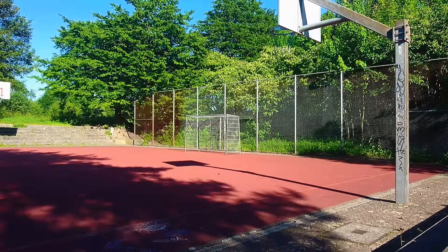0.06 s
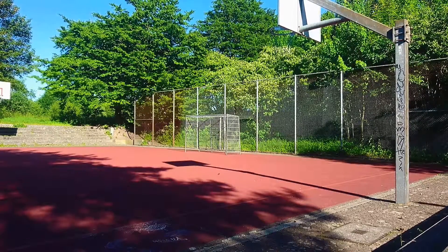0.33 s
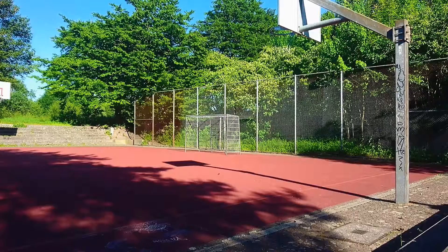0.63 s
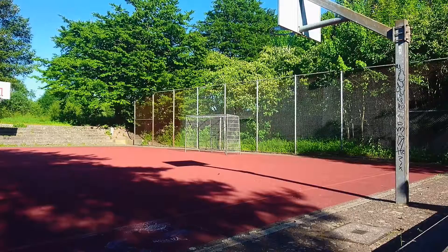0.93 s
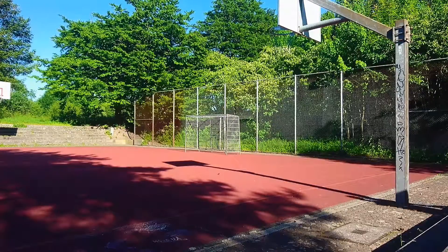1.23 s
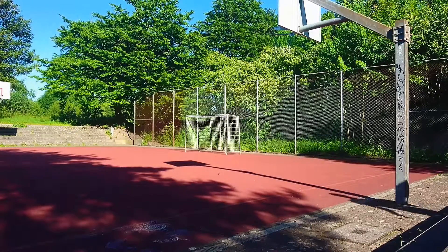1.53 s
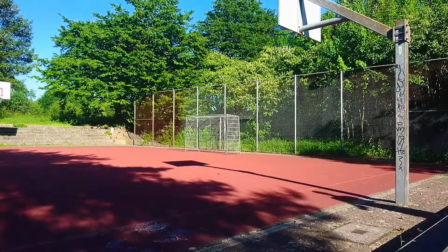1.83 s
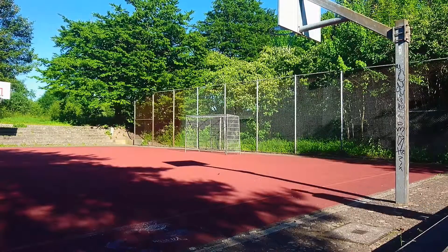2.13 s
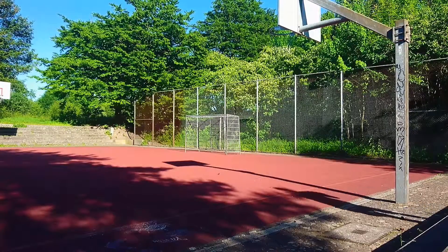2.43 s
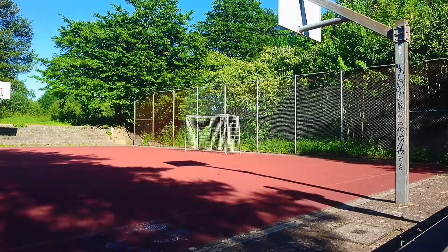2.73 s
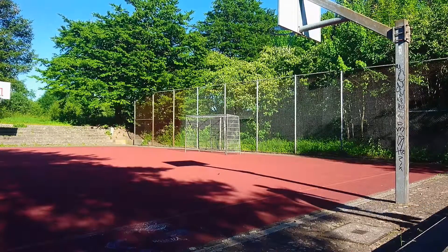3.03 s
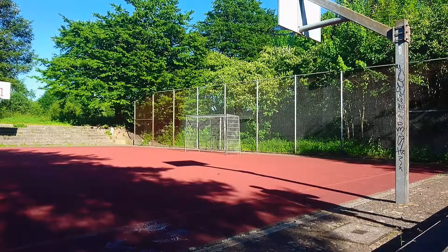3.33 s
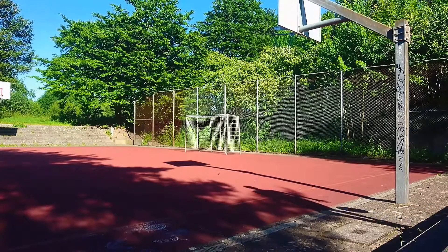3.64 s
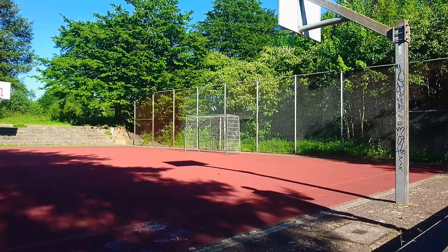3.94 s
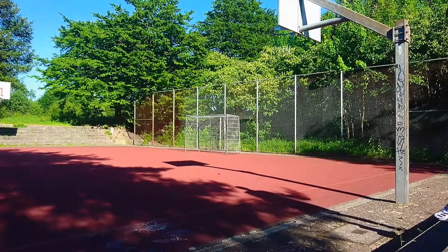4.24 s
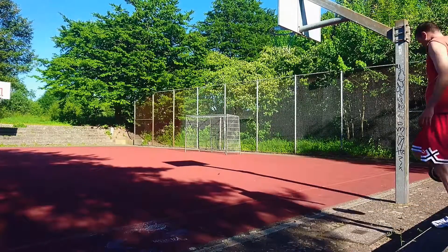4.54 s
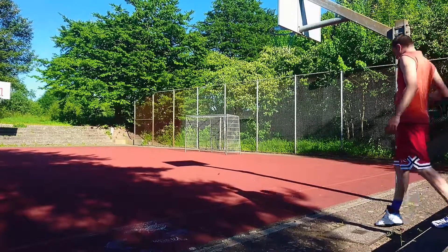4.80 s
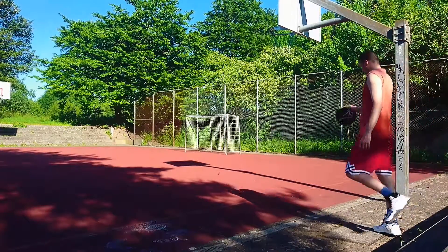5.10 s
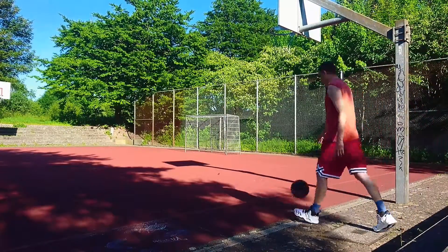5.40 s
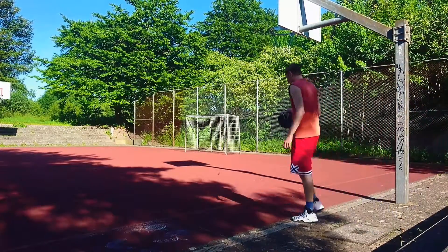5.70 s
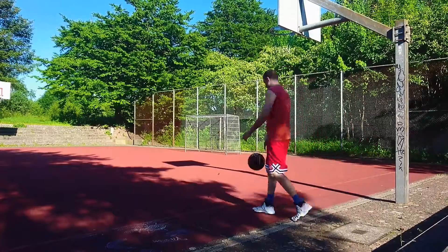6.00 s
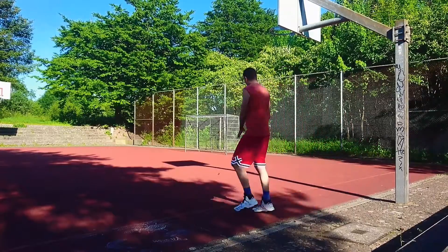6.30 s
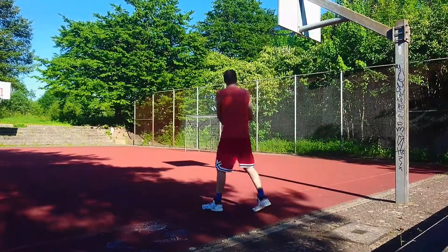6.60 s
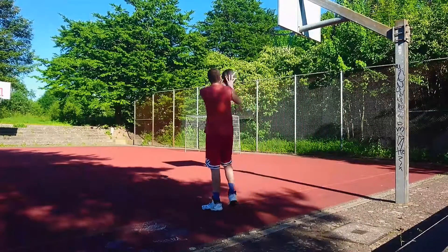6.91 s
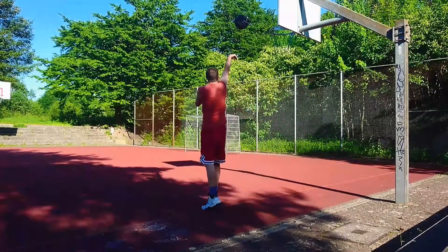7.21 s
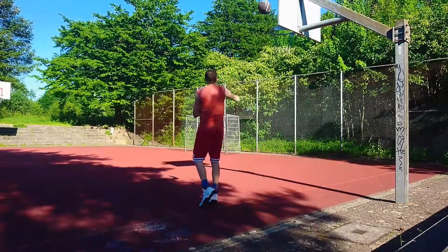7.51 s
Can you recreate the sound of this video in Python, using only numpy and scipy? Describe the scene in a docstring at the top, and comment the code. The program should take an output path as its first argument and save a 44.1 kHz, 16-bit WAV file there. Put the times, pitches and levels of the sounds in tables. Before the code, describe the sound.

A basketball is dribbled slowly on a hard outdoor court, close to the microphones. It bounces at about 0.1, 1.1, 2.2, 3.1, 3.8, 4.6, 5.5 and 6.2 seconds, moving from the right to roughly the centre. Each bounce is a sharp, full thump with a rubbery slap and a brief hollow ring, followed by a light echo from walls, trees and a fence, strongest on the first two. Much softer palm pats meet the ball between bounces, with a clearer one at about 6.4 seconds. Quiet steps with a little grit come at around 2.8 to 3.5 seconds, around 4.5, and again at 6 and 6.6. Faint, high bird chirps continue off to the right, thinning after 5 seconds. A low, distant town hum lies underneath throughout, and a far engine swells briefly at about 6.6 seconds. The last second holds only this quiet background.

```python
"""A basketball dribbled slowly past a spaced microphone pair, from the right onto an outdoor court.
Each bounce squashes the ball (thump), slaps its skin and rings the shell and the air inside.
Walls, trees and a fence answer, less strongly as the player walks on. Near the microphones, hands
and shoes make small sounds; farther off, warblers sing in a wood over the hum of a distant town."""
import sys
import numpy as np
from scipy import signal
from scipy.fft import rfft, irfft, next_fast_len
from scipy.io import wavfile

SR = 44100
rng = np.random.default_rng(int(sys.argv[2]) if len(sys.argv) > 2 else 0)


def file_out(sig):
    """Save sig as 16-bit WAV at sys.argv[1]."""
    # one column per channel
    cols = np.atleast_2d(sig).T
    # limit, then scale
    lim = np.clip(cols, -1, 1)
    pcm = np.round(lim * 32767).astype(np.int16)
    wavfile.write(sys.argv[1], SR, pcm)


N = 332955
TIME = np.arange(N) / SR

# Bounces, each on another patch of ball and ground; levels are relative. Each row: start in seconds,
# thump in dB, contact in ms, overtone in Hz and in dB against the thump, slap in dB, slap pitch
# in Hz, crack in dB, shell pitch in Hz, shell in dB, shell t60 in seconds, fence wash in dB and in Hz.
BALL_BOUNCES = [ (0.0615, -17, 10.6, 155, 2.5, -23.5, 1450, -26.5, 406, -31.5, 0.11, -54.5, 1760),
                (1.0762, -16, 10.2, 369, 0, -22, 1920, -22, 472, -32, 0.091, -49, 1900),
                (2.1630, -14.5, 10.2, 186, -13.5, -18.5, 1420, -39.5, 527, -26.5, 0.081, -45, 1300),
                (3.1078, -15, 10.45, 327, -2, -15.5, 1445, -12.5, 438, -32.5, 0.073, -58, 1200),
                (3.8278, -15.5, 10.54, 283, -2, -20, 1010, -17, 431, -22.5, 0.082, -51, 1090),
                (4.5688, -16, 11.68, 320, 1, -23.5, 1170, -19, 393, -22.5, 0.093, -50.5, 1490),
                (5.4678, -14.3, 10.1, 278, -3, -23, 1270, -24, 392, -30, 0.14, -48.5, 1500),
                (6.2259, -15.7, 9.8, 286, -0.5, -23, 1200, -27, 376, -33.5, 0.22, -54, 1080)]
# The player's way past the microphones. Each row: time in seconds, lag at the left microphone in ms,
# wall echo delay in seconds, gain on all echoes in dB.
PLAYER_PATH = [(0, .45, 0.093, 0.5), (1.1, 0.41, 0.093, -1), (3.1, .3, 0.1, -6.5), (4.57, .2, .104, -4.5),
               (5.47, -.06, .108, -5), (6.25, -0.16, 0.11, -4)]
# Air modes inside the ball. Each row: pitch in Hz, level in dB, t60 in seconds.
AIR_MODES = [(958, -54, .3), (1097, -53, .3), (1270, -50, .1), (1620, -57, .18), (2172, -63, .5),
             (2345, -67, .5), (2855, -68, .7)]
# Skin flutter for a slap pitched at 1300 Hz. Each row: frequency in Hz, relative level in dB.
SKIN_SPECTRUM = [(150, -26), (330, 4), (520, 1), (780, 0.5), (1100, 6), (1800, -3.5), (2900, -22),
                 (5000, -31), (9000, -55), (14000, -56.5)]
# Pebbled rubber striking the ground. Each row: frequency in Hz, relative level in dB.
CRACK_SPECTRUM = [(300, -15.5), (1500, 13), (3100, 11), (4300, -2.5), (6500, -11), (8500, -10),
                  (10500, -43), (14000, -21)]
# What trees and fence send back. Each row: frequency in Hz, relative level in dB.
TREE_SPECTRUM = [(40, -15.5), (100, -5), (200, 2), (400, 3), (800, 3), (1400, -3), (2500, -3), (5000, 1),
                 (12000, -21)]
# The crack scattered by fence and leaves. Each row: multiple of the wash pitch, relative level in dB.
WASH_SPECTRUM = [(.19, -10), (.6, 0.5), (1, 7), (1.5, -1.5), (2, -5.5), (3.2, -20.5), (5.5, -30),
                 (7, -56.5)]
# Hands on the rising ball. Each row: start in seconds, slap in dB, slap pitch in Hz, hollow ring in dB.
HAND_PATS = [(0.311, -39.5, 240, -50), (1.333, -45, 257, -65), (1.531, -51.5, 1900, -63),
             (2.367, -45, 250, -69), (3.342, -47, 394, -45), (3.413, -44, 670, -62),
             (4.055, -45.5, 280, -44), (4.957, -49, 640, -51), (6.447, -37, 1070, -50.5),
             (6.703, -52.5, 1706, -71.5)]
# The ball's hollow answer to a palm. Each row: frequency in Hz, relative level in dB.
HOLLOW_SPECTRUM = [(200, -30.5), (340, -15), (400, -0.5), (480, -5.5), (560, -28), (1000, -37), (3000, -81)]
# Shoes on paving. Each row: start in seconds, heel in dB, heel pitch in Hz, grit in dB, t60 in seconds.
FOOTSTEPS = [(2.789, -48, 406, -74, 0.091), (2.832, -48.5, 450, -87, 0.055),
             (3.171, -38.5, 1210, -83, 0.045), (3.498, -53, 900, -74, 0.023), (4.404, -47, 558, -79, 0.064),
             (4.474, -65, 800, -60, 0.025), (4.517, -49, 650, -68, 0.021), (4.538, -58, 595, -67, 0.2),
             (4.629, -48.5, 1170, -65.5, 0.094), (6.005, -58, 398, -84, 0.041),
             (6.045, -46, 295, -81, 0.036), (6.574, -51, 1220, -75, 0.04)]
# Grit crushed under a sole. Each row: frequency in Hz, relative level in dB.
GRIT_SPECTRUM = [(500, 0), (3500, 4.5), (7000, 4), (9000, -9), (11000, -18), (14000, -16)]
# Warblers off to the right. Each row: start in seconds, held pitch in Hz, relative level in dB.
BIRD_NOTES = [(0, 3300, -74), (.195, 5100, -71.5), (.345, 4880, -71), (.458, 5320, -70.5),
              (0.718, 4530, -66), (.735, 3980, -72), (1.035, 3970, -65), (1.338, 3970, -59.5),
              (1.434, 3980, -68.5), (1.636, 4560, -65.5), (1.812, 4450, -71.5), (1.947, 5480, -68),
              (2.228, 5200, -66.5), (2.272, 3300, -67.5), (2.28, 3900, -66), (2.577, 4530, -64.5),
              (2.892, 3924, -60.5), (3.207, 5560, -65), (3.52, 3936, -63.5), (3.82, 4500, -63),
              (4.154, 3930, -63.5), (4.465, 4560, -62.5), (4.787, 5500, -62.5), (4.833, 3260, -71),
              (5.105, 3940, -66), (6.33, 3300, -74), (6.39, 4400, -71.5), (6.671, 3990, -72),
              (7.047, 4540, -74.5), (7.47, 3280, -79)]
# A note's shape. Each row: held pitch in Hz, pitch it dives from in Hz, seconds until it falls.
NOTE_CONTOURS = [(3300, 4200, .06), (3900, 6800, .075), (4550, 6800, .072), (5500, 6900, .048)]
# Distant town and leaves. Each row: frequency in Hz, relative level in dB.
TOWN_SPECTRUM = [(15, -57), (25, -24), (40, -2), (60, -3.5), (129, -12.5), (293, -15.5), (326, -19.5),
                 (382, -15.5), (511, -18.5), (1050, -24), (2780, -30.5), (4480, -31), (5840, -35),
                 (12300, -47.5), (14000, -55)]
# A far engine that slows and swells once. Each row: time in seconds, pitch in Hz, level in dB.
FAR_ENGINE = [(0, 112.4, -71.5), (6.1, 106.7, -77), (6.65, 104.5, -57), (7.1, 104.7, -72), (7.55, 107, -69)]


def dribble():
    """Every bounce, with the direction and the echoes of the spot the player has reached."""
    out, t = np.zeros((2, N)), TIME[:SR // 2]
    for (start, thump_db, contact_ms, overtone_hz, overtone_db, slap_db, slap_hz, crack_db,
         shell_hz, shell_db, shell_t60, wash_db, wash_hz) in BALL_BOUNCES:
        contact_s = contact_ms / 1000
        late_ms, wall_s, echo_db = along(PLAYER_PATH, start)
        body = undb(thump_db) * (thump(t, contact_s) + undb(overtone_db) * overtone(t, overtone_hz))
        body += undb(slap_db) * slap(t, slap_hz, contact_s)
        snap = undb(crack_db) * crack(t, crack_db)
        ringing = ring(t, shell_hz, shell_db, shell_t60, contact_s)
        add(out, start, body + snap + ringing, late_ms)
        add(out, start, undb(echo_db) * court_echoes(t, body, ringing, snap, wall_s, wash_db, wash_hz))
    return out


def thump(t, contact_s):
    """The squashed ball loses volume and regains it; the air carries that volume's acceleration."""
    lift_off_s, skew = 0.00083, 0.75  # skew under 1: the ball flattens faster than it recovers
    on_ground = (1 - np.tanh((t - contact_s) / lift_off_s)) / 2
    push = -np.cos(2 * np.pi * (t / contact_s) ** skew) * on_ground
    return butter(butter(push, hz=650, kind="low", order=1), hz=1900, kind="low")


def overtone(t, hz, rise_s=0.0079):
    """A brief low tone of a few cycles that colours each thump."""
    return -np.cos(2 * np.pi * hz * t) * fade(t, t60=0.039) * np.minimum(t / rise_s, 1)


def slap(t, hz, contact_s):
    """Air squeezed from under the ball rings briefly; the skin flutters at touch-down and lift-off."""
    squeeze = -np.sin(2 * np.pi * hz * t) * fade(t, t60=0.0087)
    flutter = fade(t, t60=0.061) + undb(-2) * fade(t - contact_s, t60=0.01)
    skin = [(f * (hz / 1300) ** 0.17, db) for f, db in SKIN_SPECTRUM]
    return squeeze + undb(-6) * colour(rng.standard_normal(len(t)) * flutter, skin)


def crack(t, force_db):
    """A sharp first touch, then a crunch as the contact patch spreads; harder touches are brighter."""
    touch = undb(5) * (t == 0)
    crunch = undb(-3) * fade(t, t60=0.0038) + undb(-17) * fade(t, t60=0.025)
    sound = colour(crunch * rng.standard_normal(len(t)) - touch, CRACK_SPECTRUM)
    return butter(sound, hz=12000 * undb(1.3 * (force_db + 18)), kind="low")


def ring(t, shell_hz, shell_db, shell_t60, contact_s):
    """The shell hums hollowly once it leaves the ground; the enclosed air pings on."""
    airborne_s = t - contact_s
    hum = np.sin(2 * np.pi * shell_hz * airborne_s) * fade(airborne_s, shell_t60)
    air = sum(undb(db + rng.uniform(-2.1, 1.8)) * np.sin(2 * np.pi * hz * t) * fade(t, t60)
              for hz, db, t60 in AIR_MODES)
    return undb(shell_db - 1.5) * hum + air


def court_echoes(t, body, ringing, snap, wall_s, wash_db, wash_hz):
    """From around the court: dull echoes off two walls, scatter off trees, a bright wash off the fence."""
    out = np.zeros((2, N))
    wall = butter(butter(body + ringing, hz=450, kind="low"), hz=105, kind="high", order=1)
    add(out, wall_s, undb(-14) * wall)
    add(out, wall_s + 0.107, undb(-28.5) * wall)  # the farther wall
    to_trees = body + undb(3.5) * snap + undb(-16) * ringing
    trees = scatter(to_trees, early_t60=0.063, late_t60=1.165, late_db=-14.5)
    add(out, 0, undb(-15.5) * colour(trees, TREE_SPECTRUM))
    decay = fade(t, t60=0.18) + undb(-3.5) * fade(t, t60=1.0)
    envelope = decay * (1 - np.exp(-t / 0.018)) * (1 - (t / t[-1]) ** 6)
    wash = diffuse(len(t)) * envelope * undb(4.3 * wander(70, t))
    fence = [(multiple * wash_hz, db) for multiple, db in WASH_SPECTRUM]
    add(out, 0, undb(wash_db) * colour(wash, fence))
    return out


def hands():
    """Close by, a palm meets the ball, which answers hollowly; the trees scatter the pat."""
    out, t = np.zeros((2, N)), TIME[:SR // 4]
    for start, slap_db, hz, hollow_db in HAND_PATS:
        hollow = colour(rng.standard_normal(len(t)) * fade(t, t60=0.086), HOLLOW_SPECTRUM)
        pat = undb(slap_db) * knock(t, hz, t60=0.034) + undb(hollow_db) * hollow
        add(out, start, pat, late_ms=0.15)
        add(out, start, undb(-9) * scatter(pat, early_t60=0.13, late_t60=0.58, late_db=8))
    return out


def shoes():
    """Close by on the right, heels land and grit crunches under the soles."""
    out, t = np.zeros((2, N)), TIME[:SR // 4]
    for start, heel_db, hz, grit_db, t60 in FOOTSTEPS:
        grains = rng.standard_normal(len(t)) * np.exp(1.1 * rng.standard_normal(len(t)))
        grit = colour(grains * fade(t, t60), GRIT_SPECTRUM)
        add(out, start, undb(heel_db) * knock(t, hz, t60) + undb(grit_db) * grit, late_ms=0.23)
    return out


def knock(t, hz, t60):
    """The soft, broad knock of a palm or heel: dying noise that peaks at hz."""
    spectrum = [(hz / 8, -14), (hz / 2, -4), (hz, 0), (hz * 2, -11), (hz * 8, -44), (hz * 16, -62)]
    return fade(t, t60) * colour(rng.standard_normal(len(t)), spectrum)


def warblers():
    """Each note dives onto a held pitch, then fades as it slides off; the wood blurs and prolongs it."""
    dive_s, fall_s, end_hz, waver_depth_hz = 0.013, 0.028, 3350, 25
    song = np.zeros((2, N))
    for start, held_hz, db in BIRD_NOTES:
        top_hz, hold_s = along(NOTE_CONTOURS, held_hz)
        t = TIME[:int((hold_s + fall_s) * SR)]
        dive = np.exp(-(t / dive_s) ** 2)
        fall = np.clip((t - hold_s) / fall_s, 0, 1)
        waver = waver_depth_hz * np.sin(2 * np.pi * (rng.uniform(21.3, 62) * t + rng.random()))
        hz = held_hz + (top_hz - held_hz) * dive + (end_hz - held_hz) * fall + waver
        envelope = np.minimum(t / 0.013, 1) ** 0.39 * (1 - fall ** 8) * undb(-15 * fall)
        add(song, start, undb(db) * envelope * np.sin(2 * np.pi * np.cumsum(hz) / SR), late_ms=0.24)
    leaves = scatter(song[1], early_t60=0.1, late_t60=0.5, late_db=-22)
    wood = scatter(song[1], early_t60=0.6, late_t60=2, late_db=-2)
    return undb(-4) * song + (undb(-3) * leaves + wood)[:, :N]


def town():
    """Far off: traffic and leaves, a band of tyre noise, a swelling rumble and one wavering engine."""
    hum = undb(-61.5) * colour(diffuse(N), TOWN_SPECTRUM)
    tyre_band = [(500, -32.5), (850, -1), (1020, 2), (1300, -7.5), (2500, -36), (6000, -64.5)]
    tyres = undb(-71.5) * colour(diffuse(N), tyre_band)
    rumble_band = [(30, -41), (50, -15.5), (60, 13), (72, -22.5), (130, -38), (500, -77)]
    rumble = undb(-64.5) * colour(diffuse(N), rumble_band) * undb(2 * wander(per_s=0.98))
    hz, db = along(FAR_ENGINE, TIME)
    engine = undb(db) * np.sin(2 * np.pi * np.cumsum(hz + 2.7 * wander(per_s=21)) / SR)
    return butter(hum + tyres + rumble + engine, hz=54, kind="high", order=5)


def scatter(x, early_t60, late_t60, late_db):
    """Open-air reverberation: quick scatter from near by, then a longer tail from the trees."""
    t = TIME[:SR]
    decay = fade(t, early_t60) + undb(late_db) * fade(t, late_t60)
    tail = diffuse(SR) * decay * (1 - np.exp(-t / 0.0053))
    tail /= np.sqrt(np.sum(tail ** 2) / 2)
    clumps = undb(4 * np.clip(wander(80, t), -2, 2))  # trunks and fence posts answer in clumps
    return signal.fftconvolve(x[None], tail * clumps / np.sqrt(np.mean(clumps ** 2)), axes=1)


def diffuse(n, spacing_s=0.00046):
    """Noise from all sides at two spaced microphones: alike in the bass, unrelated in the treble."""
    alike = 0.9 * np.sinc(2 * np.fft.rfftfreq(n, 1 / SR) * spacing_s)
    mid, side = rfft(rng.standard_normal((2, n))) * np.sqrt([(1 + alike) / 2, (1 - alike) / 2])
    return irfft([mid + side, mid - side], n)


def add(out, start_s, x, late_ms=0):
    """Mix a sound in at start_s; it reaches the left microphone late_ms after the right."""
    arrivals = (start_s + late_ms / 1000, start_s)
    for row, part, arrival in zip(out, np.broadcast_to(x, (2, x.shape[-1])), arrivals):
        i = int(np.clip(round(arrival * SR), 0, N))
        row[i:i + len(part)] += part[:N - i]


def colour(x, points):
    """Causal filter with the given (Hz, dB) outline and unit power gain."""
    n = 2 * next_fast_len(x.shape[-1])
    hz, db = np.transpose(points)
    gain = undb(np.interp(np.log(np.fft.rfftfreq(n, 1 / SR) + 1), np.log(hz), db))
    cepstrum = irfft(np.log(gain / np.sqrt(np.mean(gain ** 2))))
    fold = np.r_[1, np.full(n // 2 - 1, 2), 1, np.zeros(n // 2 - 1)]  # gives minimum phase
    return irfft(rfft(x, n) * np.exp(rfft(cepstrum * fold)))[..., :x.shape[-1]]


def butter(x, hz, kind, order=2):
    """Causal low-, high- or band-pass."""
    return signal.sosfilt(signal.butter(order, np.minimum(hz, 0.45 * SR), kind, fs=SR, output="sos"), x)


def fade(t, t60):
    """Exponential decay from t = 0, down 60 dB after t60 seconds."""
    return (t >= 0) * np.exp(-np.log(1000) * np.maximum(t, 0) / t60)


def wander(per_s, t=TIME):
    """Random values, per_s of them a second, joined by straight lines."""
    knots = np.arange(0, t[-1] + 1, 1 / per_s)
    return np.interp(t, knots, rng.standard_normal(len(knots)))


def along(curve, at):
    """A table's other columns, interpolated along its first."""
    knots, *columns = np.transpose(curve)
    return [np.interp(at, knots, column) for column in columns]


def undb(db):
    """Decibels to gain."""
    return 10 ** (np.asarray(db) / 20)


def scene():
    """Ball and player near the microphones, warblers beyond the court, the town in the distance."""
    near = dribble() + hands() + shoes()
    # the wind filter takes the deep bass from the near sounds, which makes each thump swing
    near = butter(butter(near, hz=84, kind="high"), hz=38, kind="high", order=3)
    # sound from the court meets the left microphone with a lift in the upper middle
    lift = undb([[-21.5], [-40]]) * butter(near, hz=[750, 2700], kind="band", order=1)
    return near + lift + warblers() + town()


def record(dry):
    """The left microphone is 3 dB less sensitive than the right; the top is cut at 13.5 kHz."""
    pair = dry * undb([[-1.5], [1.5]])
    return signal.sosfilt(signal.ellip(8, 0.2, 70, 13500, fs=SR, output="sos"), pair)


dry = scene()
out = record(dry)
file_out(out)
```